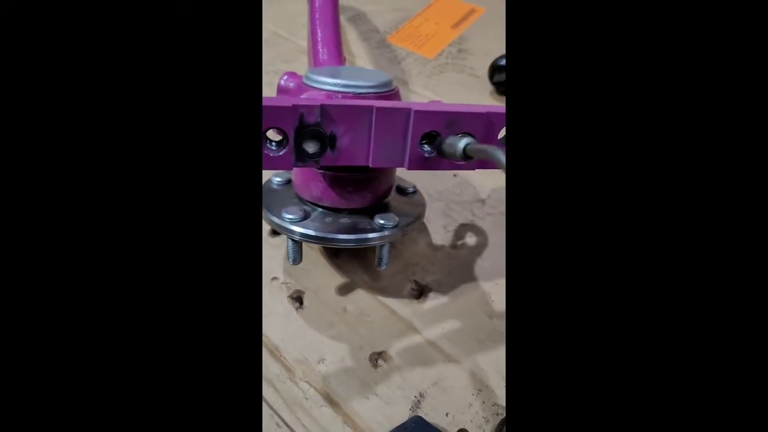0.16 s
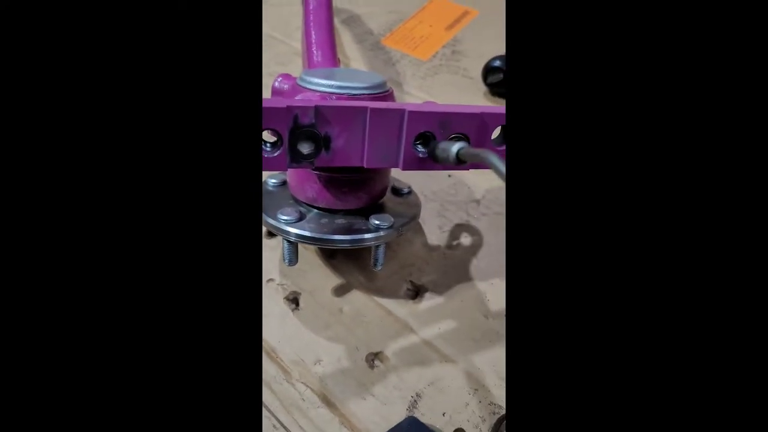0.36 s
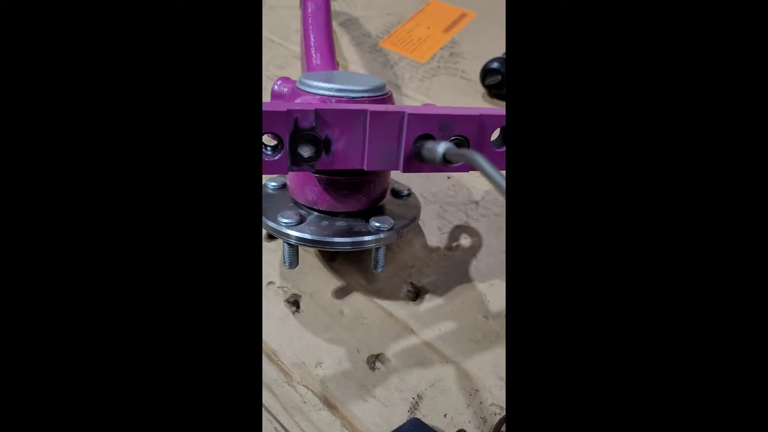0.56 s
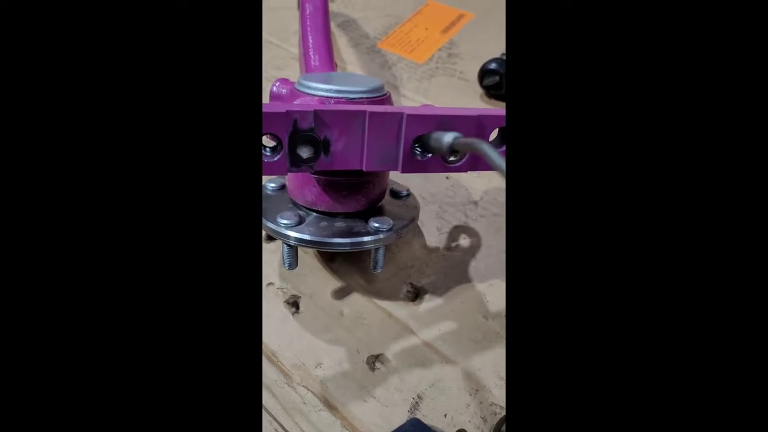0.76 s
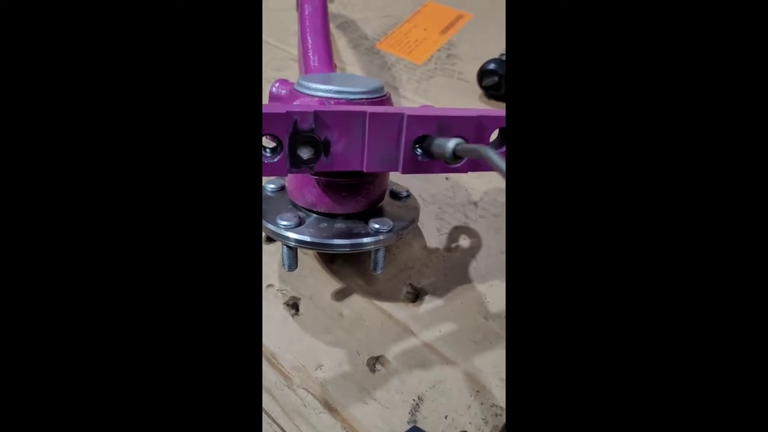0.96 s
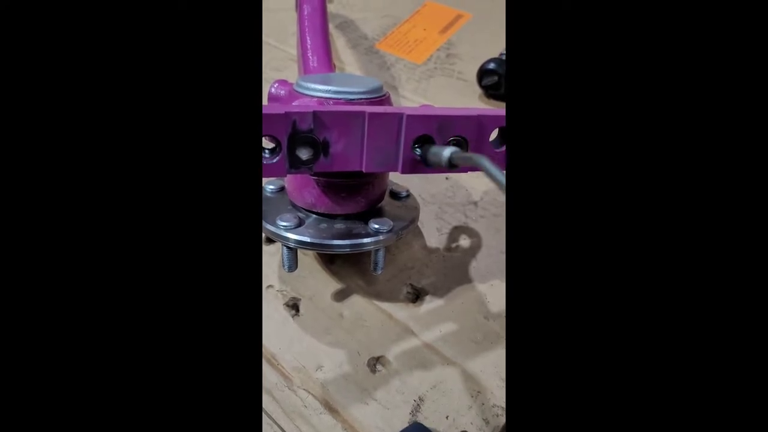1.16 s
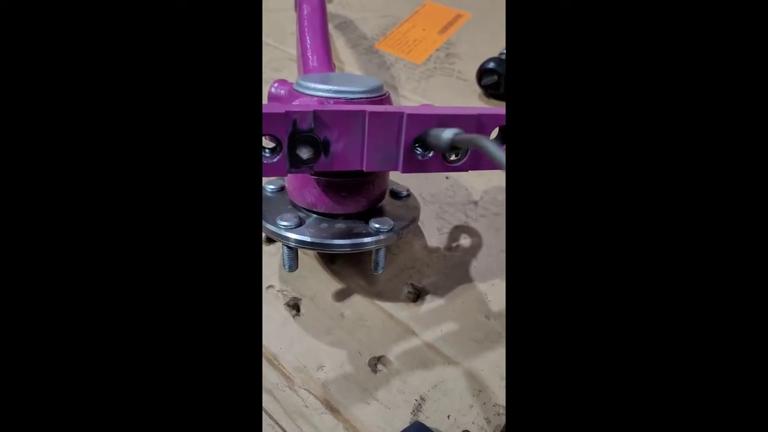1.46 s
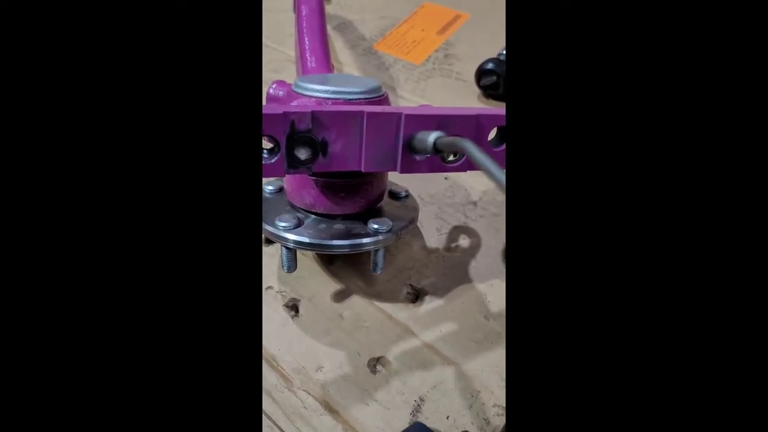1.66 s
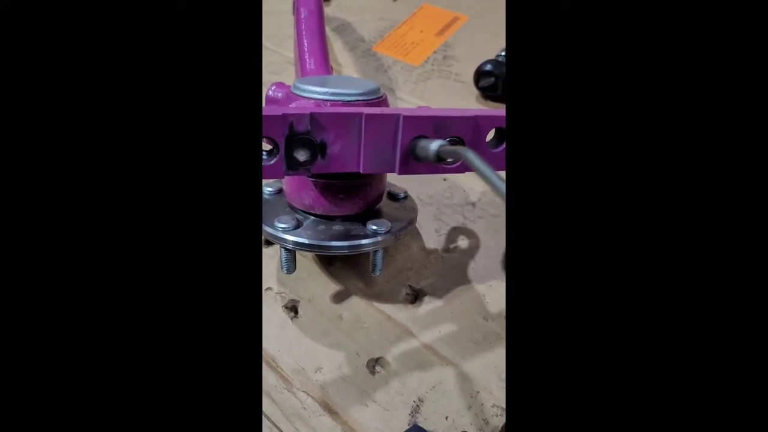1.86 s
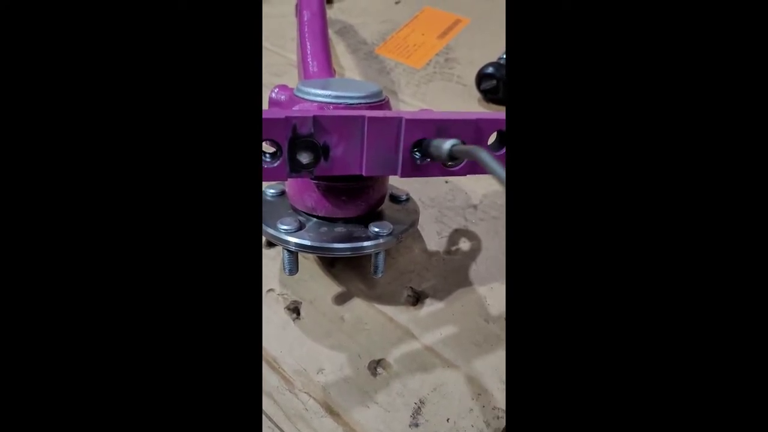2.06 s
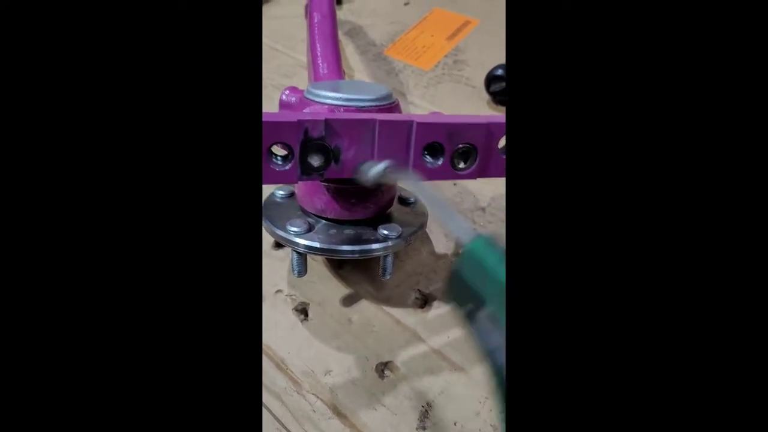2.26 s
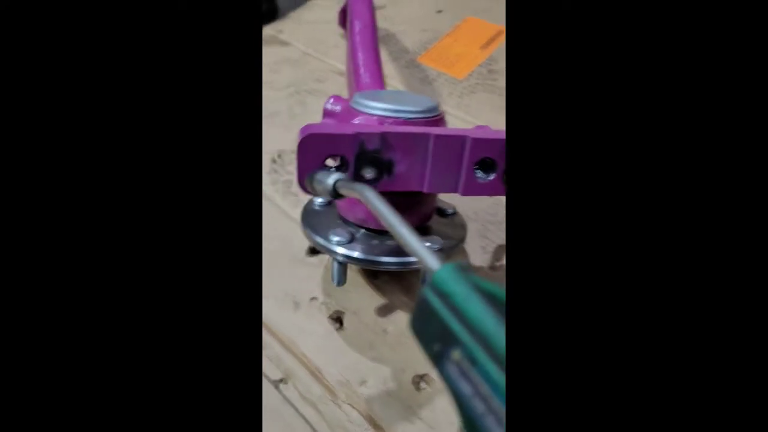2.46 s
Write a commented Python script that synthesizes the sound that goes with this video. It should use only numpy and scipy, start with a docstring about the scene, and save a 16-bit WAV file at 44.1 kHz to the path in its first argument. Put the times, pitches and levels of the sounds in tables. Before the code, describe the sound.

A compressed-air blow gun dominates: after faint workshop machinery drone, it snaps on at 0.2 s into a loud, bright, patchy hiss, surging as it strikes holes in a metal part. Brief breathy whistles come near 0.2, 1.25 and 1.3 s. Thrown-back air flutters and thumps the close microphone, mostly left, over low rumble. At 2.3 s it shuts abruptly with a dull thud; room tail, low hum, soft right-leaning puff near 2.46 s.

```python
"""Heard first: a droning workshop; then a blow gun hisses over holes in a metal part, louder on each strike.
The jet is patchy noise with hole rings, short whistles and a room tail; brightness moves with the strike.
Air thrown back buffets the left microphone port in gusts of short filtered thumps, over a low wind rumble.
The valve shuts with a low thud; the shop is left with a hum and a soft puff, stronger on the right port."""
import sys
import numpy as np
from scipy import signal
from scipy.io import wavfile
from scipy.ndimage import uniform_filter1d

SR = 44100
rng = np.random.default_rng(int(sys.argv[2]) if len(sys.argv) > 2 else 0)


def store_pcm(level_fs):
    """Save levels as 16-bit WAV."""
    pcm = np.round(np.clip(level_fs, -1, 1) * 32767).astype(np.int16)
    wavfile.write(sys.argv[1], SR, np.atleast_2d(pcm).T)


N = 114660
T = np.arange(N) / SR  # s

# machinery noise of the shop, relative density: f/Hz, level/dB
SHOP = [(30, -19), (136, -22.5), (185, -25), (328, -23), (374, -13), (450, -26), (511, -36), (1410, -37.5),
        (1600, -41), (6530, -50.5), (9390, -71), (15000, -59)]
# likeness of the shop noise at the two ports: f/Hz, correlation/-1 to 1
SHOP_SAME = [(60, 0.57), (130, 1), (290, 0.024), (640, -0.57), (1400, -0.46), (3000, .01)]
# fuzzy drone lines: f/Hz, width/Hz, level/dB
DRONE = [(368, 14, -60.5), (414, 9.6, -62.5)]
# steady motor tones: f/Hz, level/dB
TONES = [(378, -57.5), (720, -70), (1437, -75)]
SHOP_DB, SHOP_AFTER_DB = -50, -1  # noise level, and the change of noise and drone after the blast
LATE_DRONE_S, LATE_DRONE_HZ, LATE_DRONE_DB = 2.572, 430, -55.5  # a higher drone swells near the end
LATE_DIP = 0.62  # share of the other drone lost at the peak of that swell
HUM_HZ, HUM_DB, HUM_WAVER = 59.4, -47, 0.22  # waver: noise amplitude against the hum

# low wind before the port offsets: t/s, level/dB
RUMBLE = [(0.21, -45.5), (0.44, -43), (0.46, -39), (0.54, -50), (0.58, -31), (0.7, -44), (0.74, -36),
          (0.76, -47), (0.8, -38), (0.96, -51), (0.98, -44.5), (1.23, -46.5), (1.29, -31), (1.31, -43),
          (1.46, -37.5), (1.48, -33.5), (1.52, -46), (1.62, -38), (1.65, -43.5), (1.9, -37.5), (1.93, -47),
          (1.95, -40), (2.29, -43), (2.31, -35.5)]
# offset of the wind at the left and right port: level/dB
RUMBLE_PORTS_DB = [4.5, -0.5]
RUMBLE_HZ, RUMBLE_WIDTH_HZ, RUMBLE_LUMP_DB = 72.3, 96, 1.5
RUMBLE_SHARED = 0.8  # amplitude of the common wind against each port's own

# resonances in the last puff: f/Hz, width/Hz, relative level/dB
PUFF_RINGS = [(470, 110, -6), (570, 110, -4), (680, 110, -6), (850, 140, -11)]
# swell of the puff at the left and right port: level/dB
PUFF_PORTS_DB = [-50, -43]
PUFF_S, PUFF_WIDTH_S = 2.463, 0.016

# decay of the room's tail: f/Hz, T60/s
ROOM = [(300, 0.46), (900, 0.425), (1500, 1.1), (3000, 1.0), (5000, 0.82), (7500, 0.65), (11000, 0.39),
        (15000, 0.36)]
ROOM_DB = -23.5

# the trigger opens: t/s, level/dB
OPENING = [(.17, -62.5), (.186, -33), (.19, -20.5), (.2, -11.5), (.211, -0.5)]
SHUT_S, FALL_DB_PER_S = 2.308, 1595
SHUT_THUD_S, SHUT_THUD_HZ, SHUT_THUD_T60_S, SHUT_THUD_DB = 2.3145, 94, 0.06, -24.5

# a hole whistles briefly as the jet crosses its edge: t/s, relative level/dB
WHISTLES = [(.213, -18.5), (1.25, -20), (1.309, -28), (1.322, -19)]
# the whistling hole's resonances: f/Hz, width/Hz, relative level/dB
HOLE = [(5470, 67, -2), (6520, 150, -0.5)]
WHISTLE_S = 0.0061  # width of each bell-shaped swell

# gusts on the left port, before trims: start/s, length/s, level/dB
GUSTS = [(0.207, 0.004, -28.5), (0.233, 0.04, -18), (0.278, 0.039, -19), (0.328, 0.035, -18.5),
         (0.366, 0.039, -16.5), (0.409, 0.033, -19), (0.451, 0.029, -17.5), (0.489, 0.009, -21),
         (0.521, 0.048, -17), (0.573, 0.061, -20), (0.643, 0.031, -18.0), (0.68, 0.057, -18.7),
         (0.747, 0.004, -26), (0.761, 0.003, -26), (0.781, 0.02, -20), (0.813, 0.022, -19),
         (0.844, 0.036, -19.5), (0.887, 0.026, -19.5), (0.924, 0.003, -24), (0.932, 0.003, -26),
         (0.946, 0.02, -17.5), (0.971, 0.012, -21), (0.988, 0.004, -22), (0.997, 0.045, -19),
         (1.047, 0.028, -19.5), (1.083, 0.038, -17.6), (1.126, 0.012, -20), (1.148, 0.004, -23),
         (1.154, 0.004, -19), (1.184, 0.023, -18.5), (1.235, 0.029, -20.5), (1.269, 0.03, -21),
         (1.319, 0.009, -16), (1.337, 0.003, -26), (1.351, 0.042, -19.7), (1.401, 0.044, -18),
         (1.46, 0.032, -20), (1.526, 0.025, -20.5), (1.555, 0.036, -19.5), (1.604, 0.008, -22),
         (1.617, 0.004, -20), (1.629, 0.036, -19), (1.685, 0.003, -26.5), (1.707, 0.003, -25),
         (1.758, 0.026, -20), (1.791, 0.004, -19.5), (1.805, 0.047, -19.2), (1.861, 0.004, -23.5),
         (1.885, 0.005, -18), (1.899, 0.004, -17.5), (1.936, 0.008, -18.5), (1.952, 0.009, -18),
         (1.968, 0.003, -24.2), (1.973, 0.052, -20.5), (2.034, 0.005, -17.5), (2.054, 0.004, -21),
         (2.124, 0.04, -20.1), (2.166, 0.038, -19.0), (2.216, 0.009, -21.5), (2.253, 0.014, -19),
         (2.273, 0.019, -18.5)]
# short gusts that reach the right port, before the trim: t/s, level/dB
RIGHT_GUSTS = [(0.211, -38), (0.374, -32), (0.612, -24), (0.715, -29), (0.85, -21), (1.005, -20),
               (1.287, -23), (1.374, -17.5), (1.409, -37), (1.54, -44), (1.647, -24.5), (1.825, -33),
               (2.011, -23), (2.155, -18), (2.197, -24)]
# upper limits of the three thump sounds: f/Hz
THUMP_HIGHS_HZ = [440, 570, 806]
THUMP_LOW_HZ, THUMP_SPREAD_DB = 241, 1.5
THUMPS_PER_S, MOST_PER_S, CLUMP_DB = 290, 480, 6.5  # clump: random swing of the rate
LONE_S, LONE_DB = 0.0065, 4.5  # shorter gusts are one thump, lifted by this much
GUST_TRIM_DB, LULL_DB = 0.09, -37.5  # lull: left level between gusts
# the air in the left port flaps at a pitch that wanders (spread of its natural log)
FLAP_HZ, FLAP_WANDER, FLAP_WIDTH_HZ, FLAP_SHARE = 463, 0.32, 178, 0.28
STOP = 0.5  # limit of the diaphragm's travel, in sample value
LEAK_DB = -28  # left thumps reach the right port inverted
RIGHT_GUST_S, RIGHT_GUST_HZ, RIGHT_GUST_BAND_HZ, RIGHT_GUST_TRIM_DB = 0.0046, 392.4, 540, -2

# how hard the jet strikes the part, before each band's share: t/s, level/dB
STRIKE = [(0.21, -17.5), (0.27, -19.5), (0.4, -19), (0.42, -21), (0.64, -23), (0.71, -18.5), (0.76, -24.5),
          (0.78, -22.5), (0.81, -25), (0.86, -17.5), (0.92, -25), (1.0, -18.5), (1.07, -22.5),
          (1.11, -20.5), (1.14, -27), (1.21, -19.5), (1.22, -20.5), (1.25, -21.5), (1.29, -22.5),
          (1.32, -22), (1.35, -25), (1.37, -18), (1.42, -24.5), (1.47, -21.5), (1.52, -25), (1.54, -18),
          (1.59, -23.5), (1.67, -20), (1.73, -29.5), (1.83, -18.5), (1.89, -28), (2.02, -18), (2.05, -26.5),
          (2.1, -29), (2.13, -21.5), (2.17, -17.5), (2.24, -28), (2.27, -23.5), (2.31, -24.5)]
# how much of the strike's dB change each band follows: f/Hz, factor
FOLLOWS = [(200, 1.36), (1000, 0.36), (2200, 1.06), (5000, 0.83), (12000, 1.12)]
# bass of the jet at the left port, relative density: f/Hz, level/dB
BASS_LEFT = [(60, -19), (250, -8.5), (900, -12)]
# bass of the jet at the right port, relative density: f/Hz, level/dB
BASS_RIGHT = [(60, -32), (170, -6), (690, -8.5)]
# jet colour at the left port, relative density: f/Hz, level/dB
JET_LEFT = [(1378, -1.9), (2153, -4.5), (2842, -1.9), (3359, -5.1), (4221, 0.3), (5771, -2.9), (6374, -0.9),
            (7235, -3.1), (7838, -6.9), (8269, -5.0), (9561, -9.9), (12662, -5.0), (15418, -4.6)]
# jet colour at the right port, with its cancellations: f/Hz, level/dB
JET_RIGHT = [(1120, -13.6), (1378, -7.4), (1637, -7.2), (1895, -3.0), (2153, -5.7), (2498, -3.0),
             (2929, -4.8), (3273, -9.8), (4393, 5.0), (5943, -1.2), (6374, 0.8), (7407, -10.2),
             (7752, -22.7), (8441, -8.7), (9647, -10.8), (10594, -4.7), (12059, -3.7), (12489, -7.6),
             (13609, -9.9), (15418, -6.3)]
# likeness of the jet at the two ports: f/Hz, correlation/0 to 1
SAME = [(1034, 0.2), (2498, 0.64), (2929, 0.49), (3359, 0.06), (4134, 0.79), (5943, 0.21), (6288, 0.5),
        (7838, 0.08), (8269, 0.29), (8958, 0.15), (9500, 0)]
# the right port's phase: f/Hz, phase/rad
TURN = [(1120, -2.6), (1500, -1.7), (2300, -3.1), (3200, -4.1), (3500, -9.0), (4200, -9.5), (5500, -12.3),
        (7400, -15.7)]
# the holes' air resonances, swelling and fading as the nozzle moves: f/Hz, width/Hz, mean lift/dB
HOLE_RINGS = [(4400, 67, 2), (5650, 140, 2.5), (6210, 144, 2.5), (7240, 160, 3), (8270, 390, 2)]
# extra level at the centre of the middle band: t/s, level/dB
MIDDLE = [(.2, 2.5), (.4, -2), (.56, 1.5), (.65, -0.5), (.76, 2), (.86, -0.5), (.95, 2.5), (1.01, -2),
          (1.08, 1.5), (1.17, 1.5), (1.26, -1), (1.33, -5), (1.41, 0), (1.51, 0), (1.65, 1.5), (1.73, 1),
          (1.85, 1), (1.99, 1.5), (2.09, 3), (2.28, 2)]
STRIKE_MEAN_DB, JET_DB = -23, -15.5
MIDDLE_HZ, MIDDLE_OCTAVES = 2560, 0.42
RING_SWELL = 0.78  # random spread of each lift, as a share of it

BASS_CUT_HZ, EDGE_HZ = 32, 15520  # limits of the microphone's band


def gain_of(db):
    """Amplitude factor of a level in dB."""
    return 10 ** (np.asarray(db) / 20)


def evened(x):
    """Scale to an RMS of 1."""
    return x / np.sqrt(np.mean(x ** 2) + 1e-20)


def over_time(points, t):
    """Straight lines between (time, value) points."""
    return np.interp(t, *np.transpose(points))


def read(points, hz):
    """Straight lines between (frequency, value) points on a log frequency axis."""
    f, value = np.transpose(points)
    return np.interp(np.log(hz + 1), np.log(f + 1), value)


def wander(count, span):
    """Smooth chance of RMS 1; span is the length of each smoothing pass."""
    once = uniform_filter1d(rng.standard_normal(count), span)
    return evened(uniform_filter1d(once, span))


def fuzzy(hz, width_hz):
    """Noise in one steep resonance, RMS 1: low-passed complex noise turned up to its pitch."""
    r = np.exp(-np.pi * width_hz / SR)
    noise = rng.standard_normal(N) + 1j * rng.standard_normal(N)
    low = signal.lfilter([1], np.poly([r, r]), noise)
    return evened((low * np.exp(2j * np.pi * hz * T)).real)


def bumps(rows, width_s):
    """Bell-shaped swells at (time, level in dB)."""
    return sum(gain_of(db) * np.exp(-.5 * ((T - s) / width_s) ** 2) for s, db in rows)


def pair(size, same, field_db):
    """Two partly alike noises from random short-time spectra, shaped over frequency and time."""
    hop = size // 4
    hz = np.fft.rfftfreq(size, 1 / SR)
    t = np.arange(N // hop + 5) * hop / SR
    a, b, c, d = rng.standard_normal((len(t), len(hz), 4)).T
    alike = same(hz)[:, None]
    left, own = a + 1j * b, c + 1j * d
    right = alike * left + np.sqrt(1 - abs(alike) ** 2) * own
    z = np.array([left, right]) * gain_of(field_db(hz, t))
    return evened(signal.istft(z, nperseg=size, noverlap=size - hop)[1][:, :N])


def valve():
    """The trigger opens and shuts: the gain of the air flow."""
    return gain_of(over_time(OPENING, T) + np.minimum(0, FALL_DB_PER_S * (SHUT_S - T)))


def shop():
    """Machinery noise, fuzzy drone lines and motor tones; after the blast a hum sets in."""
    after = np.clip((T - SHUT_S) / 0.022, 0, 1)
    bed = gain_of(SHOP_DB) * pair(size=2048, same=lambda hz: np.clip(read(SHOP_SAME, hz), -1, 1),
                                  field_db=lambda hz, t: read(SHOP, hz)[:, None])
    drone = np.array([sum(gain_of(db) * fuzzy(hz, width) for hz, width, db in DRONE) for port in "LR"])
    drone = drone + sum(gain_of(db) * np.sqrt(2) * np.sin(2 * np.pi * hz * T) for hz, db in TONES)
    late = bumps([(LATE_DRONE_S, 0)], 0.02)
    late_tone = gain_of(LATE_DRONE_DB) * late * np.sin(2 * np.pi * LATE_DRONE_HZ * T)
    drone = drone * (1 - LATE_DIP * late) + late_tone
    hum = np.sqrt(2) * np.sin(2 * np.pi * HUM_HZ * T) + HUM_WAVER * fuzzy(HUM_HZ, 30)
    return (bed + drone) * gain_of(SHOP_AFTER_DB * after) + gain_of(HUM_DB) * after * hum


def room(x):
    """Reverberation as a noise tail, each band dying at its own speed."""
    hz, t, z = signal.stft(rng.standard_normal((2, SR)), SR, nperseg=256)
    decay = gain_of(-60 * t / read(ROOM, hz)[:, None])
    tail = signal.istft(z * decay, SR, nperseg=256)[1]
    return signal.fftconvolve(x, tail / np.linalg.norm(tail[0]), axes=1)[:, :N]


def puff():
    """A last soft puff of air: resonant noise in a short swell, stronger on the right port."""
    def port(port_db):
        air = sum(gain_of(db) * fuzzy(hz, width) for hz, width, db in PUFF_RINGS)
        return bumps([(PUFF_S, port_db)], PUFF_WIDTH_S) * air
    return np.array([port(db) for db in PUFF_PORTS_DB])


def rumble():
    """Lumpy low wind: low resonant noise, partly shared by the two ports."""
    level_db = over_time(RUMBLE, T)
    both = fuzzy(RUMBLE_HZ, RUMBLE_WIDTH_HZ)

    def port(port_db):
        lumps_db = RUMBLE_LUMP_DB * wander(count=N, span=700)
        wind = evened(fuzzy(RUMBLE_HZ, RUMBLE_WIDTH_HZ) + RUMBLE_SHARED * both)
        return gain_of(port_db + level_db + lumps_db) * wind
    return valve() * np.array([port(db) for db in RUMBLE_PORTS_DB])


def shut_thud():
    """The pressure drop when the valve shuts: a decaying low sine that starts downwards."""
    t = np.maximum(T - SHUT_THUD_S, 0)
    return -gain_of(SHUT_THUD_DB - 60 * t / SHUT_THUD_T60_S) * np.sin(2 * np.pi * SHUT_THUD_HZ * t)


def gust_kicks():
    """Uneven pushes and pulls on the left diaphragm, with the gust level that drives them."""
    level, first, lone = gain_of(LULL_DB) * valve(), np.zeros(N), np.zeros(N)
    for start, length, db in GUSTS:
        inside = (T >= start) & (T < start + length)
        level[inside] = gain_of(db + GUST_TRIM_DB + LONE_DB * (length < LONE_S))
        lone[inside] = length < LONE_S
        first[int(start * SR) + 2] = 1
    rate = np.minimum(MOST_PER_S, THUMPS_PER_S * gain_of(CLUMP_DB * wander(count=N, span=150)))
    turns = np.cumsum(rate) / SR  # one kick each time this passes a whole number
    more = (1 - lone) * (np.diff(np.floor(turns), prepend=0) > 0)
    kicks = np.maximum(first, more) * rng.choice([-1, 1], N)
    return kicks * gain_of(THUMP_SPREAD_DB * rng.standard_normal(N)), level


def dull_thumps(kicks, level, cut):
    """Band-limited thumps, each kick drawing one of three upper limits."""
    kind, thumps = rng.integers(0, len(THUMP_HIGHS_HZ), N), 0
    for k, hz in enumerate(THUMP_HIGHS_HZ):
        sos = np.vstack([cut, signal.butter(2, hz, fs=SR, output="sos")])
        steady = np.std(signal.sosfilt(sos, kicks))  # reference: kicks without gust levels
        thumps = thumps + signal.sosfilt(sos, kicks * level * (kind == k)) / steady
    return thumps


def flap(kicks, level, cut):
    """Air in the left port as a damped resonance that rings at a gliding pitch."""
    pitch = FLAP_HZ * np.exp(FLAP_WANDER * wander(count=N, span=300))
    turn = np.exp(2j * np.pi * np.cumsum(pitch) / SR)
    r = np.exp(-np.pi * FLAP_WIDTH_HZ / SR)

    def ring(x):
        return signal.sosfilt(cut, (turn * signal.lfilter([1], [1, -r], x / turn)).real)
    return ring(kicks * level) / np.std(ring(kicks))


def buffeting():
    """Thrown-back air kicks the left diaphragm up to its stop; separate short gusts reach the right."""
    kicks, level = gust_kicks()
    cut = signal.butter(5, THUMP_LOW_HZ, "high", fs=SR, output="sos")
    thumps = np.sqrt(1 - FLAP_SHARE) * dull_thumps(kicks, level, cut)
    thumps = thumps + np.sqrt(FLAP_SHARE) * flap(kicks, level, cut)
    thumps = STOP * np.tanh(thumps / STOP)  # the diaphragm's travel is limited
    right = bumps(RIGHT_GUSTS, RIGHT_GUST_S) * fuzzy(RIGHT_GUST_HZ, RIGHT_GUST_BAND_HZ)
    return np.array([thumps, gain_of(RIGHT_GUST_TRIM_DB) * right - gain_of(LEAK_DB) * thumps])


def whistles():
    """Breathy tones of the hole: narrow resonant noise in short swells, louder on the right."""
    tone = sum(gain_of(db) * fuzzy(hz, width) for hz, width, db in HOLE)
    return gain_of([[-3], [.1]]) * bumps(WHISTLES, WHISTLE_S) * tone


def jet(patchy_db=1.1, flicker_db=1.25):
    """Turbulent hiss: port colour, strike, hole rings, drifting patches and a flicker shared by all bands."""
    def field_db(hz, t):
        patches = rng.standard_normal((len(t), len(hz))).T
        patches = uniform_filter1d(patches, size=7, axis=0)
        patches = evened(uniform_filter1d(patches, size=8, axis=1))
        strike = read(FOLLOWS, hz)[:, None] * (over_time(STRIKE, t) - STRIKE_MEAN_DB)
        colour = np.array([read(BASS_LEFT + JET_LEFT, hz), read(BASS_RIGHT + JET_RIGHT, hz)])[..., None]
        rings = 0
        for f, width, db in HOLE_RINGS:
            peak = 1 / (1 + (2 * (hz - f) / width) ** 2)
            rings = rings + db * np.outer(peak, 1 + RING_SWELL * wander(count=len(t), span=12))
        band = np.exp(-.5 * (np.log2((hz + 1) / MIDDLE_HZ) / MIDDLE_OCTAVES) ** 2)
        middle = np.outer(band, over_time(MIDDLE, t))
        return colour + rings + middle + strike + patchy_db * patches

    def same(hz):
        return np.clip(read(SAME, hz), 0, 1) * np.exp(1j * read(TURN, hz))
    hiss = pair(size=512, same=same, field_db=field_db)
    return gain_of(JET_DB + flicker_db * wander(count=N, span=60)) * hiss * valve()


def scene():
    """The shop, the wind and the buffeted ports around the jet; only jet and whistles excite the room."""
    hiss = jet() + whistles()
    background = shop() + gain_of(ROOM_DB) * room(hiss) + puff()
    return background + rumble() + shut_thud() + buffeting() + hiss


def record(dry):
    """The microphone's bass cut, then the band limit."""
    cut = signal.sosfilt(signal.butter(2, BASS_CUT_HZ, "high", fs=SR, output="sos"), dry)
    band_limit = signal.firwin(1501, EDGE_HZ, window=("kaiser", 9), fs=SR)
    return signal.oaconvolve(cut, band_limit[None], "same")


dry = scene()
out = record(dry)
store_pcm(out)
```